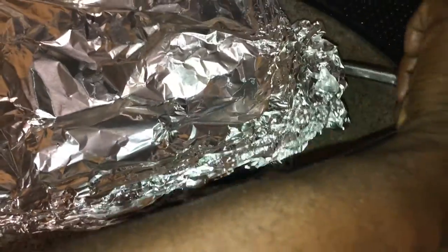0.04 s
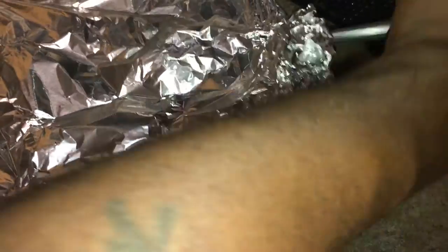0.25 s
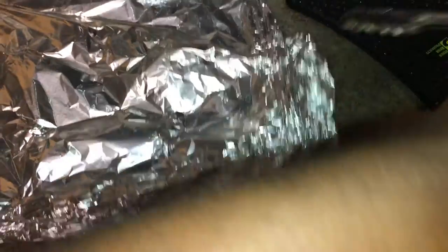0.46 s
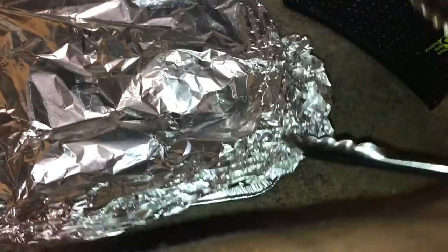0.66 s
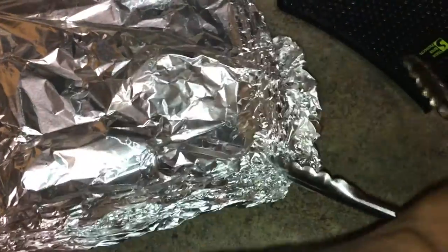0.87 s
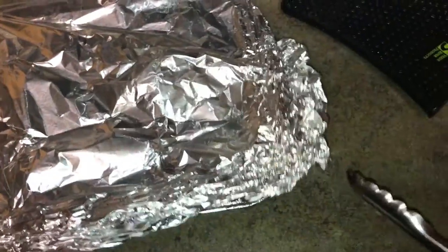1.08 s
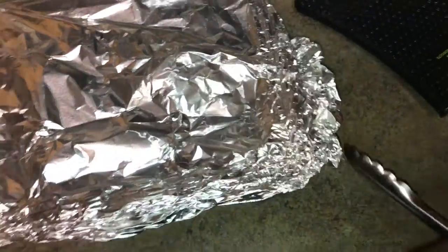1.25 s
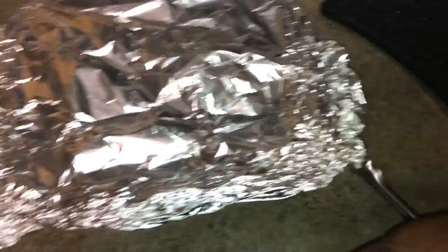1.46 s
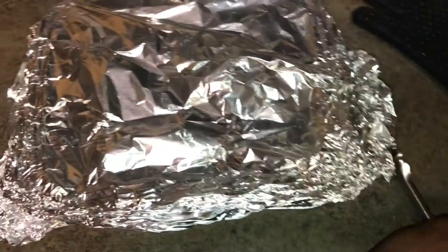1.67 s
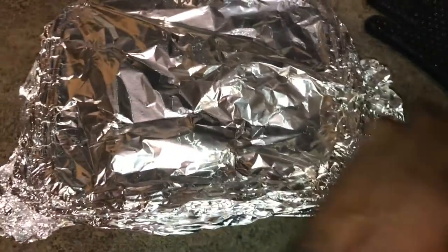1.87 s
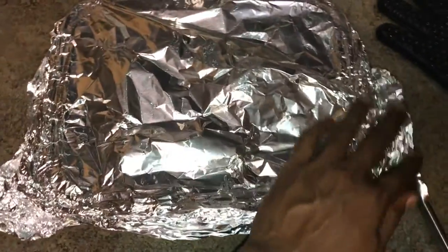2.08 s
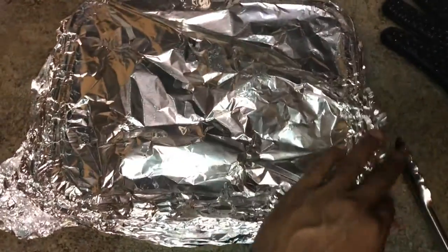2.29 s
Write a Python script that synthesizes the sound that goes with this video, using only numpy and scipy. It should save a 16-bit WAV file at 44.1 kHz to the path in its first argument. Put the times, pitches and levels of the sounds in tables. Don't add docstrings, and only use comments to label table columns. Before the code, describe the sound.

Aluminum foil crackles as it is crimped over a pan, then metal tongs clack on a counter

```python
import sys
import numpy as np
from scipy import signal
from scipy.fft import rfft, irfft
from scipy.io import wavfile

SR = 44100
rng = np.random.default_rng(int(sys.argv[2]) if len(sys.argv) > 2 else 0)


def gain_from_decibels(decibels):
    exponent = np.asarray(decibels, float) / 20
    return 10 ** exponent


def wav_record(signal):
    frames = np.transpose(np.atleast_2d(signal))
    bounded = np.clip(frames, -1, 1)
    quanta = np.round(bounded * 32767).astype(np.int16)
    wavfile.write(sys.argv[1], SR, quanta)


N = 102973

# [t/s, level/dB, brightness/dB]
PRESSURE = [
    [(0.0, -32, -22), (0.06, -49, -23), (0.15, -56.5, -5), (0.175, -57, -24), (0.205, -58, -26),
     (0.241, -46.5, -19), (0.28, -35, -1.5), (0.40, -43, 12), (0.478, -47, 11), (0.495, -48, -8),
     (0.6, -50.5, -12), (0.64, -66, -19), (0.7, -74, -15)],
    [(0.722, -48.5, 12.5), (0.80, -40.5, -19), (0.87, -49, -19), (0.93, -54.5, -35), (0.955, -59.5, 6),
     (1.0, -47.5, 1), (1.06, -46, 20.5), (1.09, -45, -23), (1.22, -69, 3.5)],
    [(2.084, -50.5, -3.5), (2.15, -49.5, -1.5), (2.25, -51.5, 1.5), (2.29, -43.5, -9), (2.335, -55, -3)],
]
# [t/s, peak level/dB, hold/s, dimple f/Hz, dimple level/dB]
HAND_SNAPS = [(0.0018, -29, .002, 1330, 8), (0.002, -34, .002, 4400, 11), (0.010, -29, .005, 380, 4),
              (0.011, -36, .002, 4300, 9), (0.018, -33, .004, 2400, -3), (0.027, -31, .003, 4400, -2),
              (0.213, -38, .002, 6300, -4), (0.229, -46, .003, 12000, -8), (0.242, -40, .002, 2500, -3),
              (0.249, -38, .002, 3540, -3), (0.255, -35, .003, 888, -2), (0.260, -36, .006, 255, 5),
              (0.278, -31, .003, 1140, -2), (0.293, -29, .004, 1770, -3), (0.304, -31, .003, 330, 0),
              (0.3225, -26, .007, 1275, 7), (0.345, -30, .003, 3000, -6), (0.388, -28, .004, 5740, -6),
              (0.398, -30, .003, 2050, -3), (0.425, -29, .003, 3400, -6), (0.451, -27, .004, 2000, -3),
              (0.472, -32, .003, 8500, -6), (0.5325, -24, .0015, 3300, -10), (0.554, -38, .004, 540, -2),
              (0.597, -42, .006, 2000, -10), (0.659, -40, .002, 3100, -2), (2.100, -42, .005, 958, 2),
              (2.1615, -30, .003, 3800, -3), (2.166, -54, .012, 360, 15), (2.1935, -30, .002, 1130, -6),
              (2.266, -39, .006, 1000, -5), (2.278, -35, .001, 1500, -10)]
# [t/s, peak level/dB, hold/s, dimple f/Hz, dimple level/dB]
TONG_SNAPS = [(0.7253, -26.5, 0.0049, 1140, -5.5), (0.7297, -24.5, 0.0041, 6670, -1),
              (0.744, -25, 0.0034, 1090, -7), (0.748, -31.5, 0.0029, 2340, -0.5),
              (0.756, -33, 0.0049, 1190, 1), (0.781, -40, 0.002, 1040, 6),
              (0.802, -31.5, 0.0083, 1150, 2.5), (0.810, -25, .002, 1050, -3), (0.816, -48, .03, 347, 17),
              (0.827, -32, .003, 5800, -8), (0.852, -27, .002, 3600, -10), (0.884, -38, 0.012, 3500, 3),
              (0.902, -39, 0.0032, 2960, 7.5), (0.914, -30, 0.002, 3280, 1), (0.918, -41.5, 0.006, 1910, 3),
              (0.967, -18, 0.01, 820, -12), (0.98, -22, 0.0022, 357, -3.5), (1.006, -29, 0.011, 800, -4),
              (1.017, -24, 0.0042, 873, -9.5), (1.021, -27.5, 0.0073, 784, -2),
              (1.031, -17, 0.0046, 2760, -13), (1.035, -18, 0.00029, 800, -16.5),
              (1.037, -17, 0.0021, 3650, -20), (1.045, -26.5, 0.0067, 2440, -15),
              (1.051, -26, 0.0063, 3650, -20), (1.101, -41.5, 0.0037, 744, -17),
              (1.165, -39, 0.0072, 1580, -35)]
# [f/Hz, density level/dB]
RUSTLE_SPECTRUM = [(88, -53), (303, 2.5), (1140, 0), (1900, -4.5), (2270, -3.5), (7400, -7.5), (8700, -4),
                   (10300, -13.5), (16000, -11)]
# [f/Hz, density level/dB]
SNAP_SPECTRUM = [(120, -19), (200, -27.5), (735, 0), (3560, 2), (4680, -1.5), (6400, 3.5), (7140, -2.5),
                 (9580, -3), (16000, -5.5)]
# [t/s, peak level/dB, hold/s, thud level/dB, boom level/dB]
KNOCKS = [
    (1.4286, -6, 0.0011, -6.5, -11),
    (1.45, -50, 0.00071, 13, -10),
    (1.568, -20.5, 0.001, 1.5, -5.5),
    (1.617, -60.5, 0.076, 10, -8),
    (1.685, -43.5, 0.019, 6, -9),
    (1.71, -3.5, 0.0009, -17.5, -36),
    (1.7121, -11.5, 0.00664, -18.5, -5.5),
    (1.752, -16.5, 0.0028, -16.5, -10),
    (1.763, -46, 0.01, -11, 4),
]
HELD_KNOCKS = 4
# [f/Hz, level/dB, t60/s]
ARMS_HELD = [(2550, -10, .05), (4110, -7, .08), (5190, -24, .25), (5800, -18, .28), (5950, -5, .03),
             (7860, -20, .1), (8740, -20, .22)]
# [f/Hz, level/dB, t60/s]
ARMS_LOOSE = [(3350, -4, .03), (3580, 0, .035), (3790, -5, .05), (4772, -11, .2), (5240, -20, .42),
              (5880, -17, .15), (6270, -15, .33), (7176, -24, .3), (7400, -16, .1), (8823, -18, .11),
              (9600, -20, .15), (10730, -16, .1), (12860, -20, .15), (14300, -16, .1)]
# [f/Hz, density level/dB]
CLACK_SPECTRUM = [(500, -6), (1200, -14.5), (1910, -9.5), (3300, 3), (5000, -1.5), (6650, -2), (14200, -9),
                  (16000, -9.5)]
# [f/Hz, density level/dB]
THUD_SPECTRUM = [(88, -32), (150, -5.5), (218, -4), (588, -1.5), (1450, -8), (1730, -12.5), (3000, -15),
                 (3900, -50), (6600, -120)]
# [f/Hz, width/Hz, level/dB]
COUNTER_BODY = [(163, 22.5, -7), (260, 49, 1.5), (322, 32, -7), (460, 20, -7.5), (567, 14, -4),
                (800, 32, -16), (935, 27, -21)]
# [f/Hz, level/dB, t60/s]
CUPBOARD = [(91, -12, 0.13), (135, -12, 0.11), (275, -9, 0.07)]
# [f/Hz, level/dB, t60/s]
STRUCK_FLAT = [(177.2, -22.5, 0.58), (330, -8.5, 0.046), (464.6, -18, 0.33), (570, -13, 0.046),
               (800, -14.5, 0.073), (960, -14, 0.039), (1250, -12.5, 0.041), (1383, -19, .05)]
# [f/Hz, level/dB, t60/s]
STRUCK_EDGE = [(277.5, 8.5, 0.073), (492, -1.5, 0.086), (570, -5, 0.14), (936, -35, 0.069),
               (1478, -6, 0.054)]
# [f/Hz, density level/dB]
AIR_SPECTRUM = [(15, -4), (25, 2.5), (74, -3.5), (206, -18), (2760, -32), (6920, -33), (7710, -37.5),
                (11600, -38.5), (16000, -41.5)]

GRAIN_CYCLES, DIMPLE_CYCLES = 25, 24
SNAP_DB, SNAP_T60_S, TICK_DB, TICK_T60_S = -11, 0.022, -6, 0.00034
SHIVER_DB, SHIVER_T60_S, SHIVER_CUT_HZ = -7, 0.075, 3600
DIMPLE_DB, BRIGHT_HZ = -3, 4000
CLACK_DB, CLACK_T60_S, CLACK_TAIL_DB, CLACK_TAIL_T60_S = -13.5, 0.031, -20, 0.31
THUD_DB, THUD_T60_S, THUD_TAIL_DB, THUD_TAIL_T60_S = -8.5, 0.024, -8, 0.32
RING_DB, RING_BLUR_HZ, RING_WAVER_DB = -22, 32, 2.5
BODY_DB, STRUCK_DB, CRACK_DB = -2, -7.5, -25
KITCHEN_DB, KITCHEN_T60_S, WALL_CUT_HZ, AIR_DB = -12, 0.42, 2540, -56
RUMBLE_CUT_HZ, TOP_CUT_HZ, OVERLOAD = 73, 16080, 0.6


def foil():
    return rustle() + snaps() + dimples()


def rustle():
    t = np.arange(N) / SR
    push, tight_db = np.zeros((2, N))
    for rows in PRESSURE:
        s, db, bright_db = np.transpose(rows)
        tight_db += np.interp(t, s, bright_db, left=0, right=0)
        push += gain_from_decibels(np.interp(t, s, db, left=-120, right=-120))
    push *= gain_from_decibels(drift(64))
    rub = colour(push * crackle(7000, 1.5), RUSTLE_SPECTRUM)
    low = lowpass(rub, BRIGHT_HZ)
    return low + (rub - low) * gain_from_decibels(tight_db)


def snaps():
    snap, shiver = np.zeros((2, N))
    for s, db, hold, _, _ in HAND_SNAPS + TONG_SNAPS:
        tick = gain_from_decibels(TICK_DB) * burst(s, 0, TICK_T60_S)
        snap += gain_from_decibels(db + SNAP_DB) * (burst(s, hold, SNAP_T60_S) + tick)
        shiver += gain_from_decibels(db + SNAP_DB + SHIVER_DB) * burst(s, hold, SHIVER_T60_S)
    dull = lowpass(shiver * crackle(9000, 4.0), SHIVER_CUT_HZ)
    return colour(snap * crackle(8000, 5.6) + dull, SNAP_SPECTRUM)


def dimples():
    rub, out = rng.standard_normal(N), np.zeros(N)
    for s, db, hold, hz, dimple_db in HAND_SNAPS + TONG_SNAPS:
        out += gain_from_decibels(db + dimple_db + DIMPLE_DB) * dimple(s, hold, hz, rub)
    return out


def dimple(s, hold, hz, rub):
    if hz < 400:
        t = np.arange(N) / SR - s
        return 0.63 * burst(s, hold, DIMPLE_CYCLES / hz) * np.sin(2 * np.pi * hz * t)
    near = slice(int(s * SR), int((s + 0.25) * SR))
    kick = (burst(s, 0.17 * hold, 0.0027 + 4.5 * hold) * rub)[near]
    low = ring(kick, hz, DIMPLE_CYCLES / hz)
    tone = np.zeros(N)
    tone[near] = low / np.abs(low).max()
    if 1200 < hz < 2500:
        high = ring(kick, min(hz * 1.85, 15000), DIMPLE_CYCLES / hz / 1.6)
        tone[near] += 1.56 * high / np.abs(high).max()
    return tone


def crackle(rate, spread_db):
    sizes = gain_from_decibels(spread_db * np.minimum(rng.exponential(1, N), 4)) * rng.choice([-1, 1], N)
    clicks = sizes * (rng.random(N) < rate / SR)
    patch = rng.integers(0, 30, N)
    rings = np.zeros(N)
    for k, hz in enumerate(np.geomspace(250, 15000, 30)):
        rings += ring(clicks * (patch == k), hz, GRAIN_CYCLES / hz) * hz / 3000
    return rms_one(rms_one(rings) + 1.98 * rms_one(clicks))


def tongs():
    return arms() + clack_and_thud() + cupboard()


def arms():
    out = np.zeros(N)
    buzz = np.array([drift(60), drift(90)])
    for rows, modes in ((KNOCKS[:HELD_KNOCKS], ARMS_HELD), (KNOCKS[HELD_KNOCKS:], ARMS_LOOSE)):
        for hz, mode_db, t60 in modes:
            shake = sum(gain_from_decibels(db + RING_DB + mode_db) * burst(s, hold, t60) for s, db, hold, *_ in rows)
            waver = np.roll(buzz, int(hz), axis=1)
            phase = 2 * np.pi * np.cumsum(hz + RING_BLUR_HZ * waver[1]) / SR
            out += shake * gain_from_decibels(RING_WAVER_DB * waver[0]) * np.sin(phase)
    return out


def clack_and_thud():
    clack, thud = np.zeros((2, N))
    for s, db, hold, thud_db, _ in KNOCKS:
        clack_tail = gain_from_decibels(CLACK_TAIL_DB) * burst(s, hold, CLACK_TAIL_T60_S)
        clack += gain_from_decibels(db + CLACK_DB) * (burst(s, hold, CLACK_T60_S) + clack_tail)
        thud_tail = gain_from_decibels(THUD_TAIL_DB) * burst(s, hold, THUD_TAIL_T60_S)
        thud += gain_from_decibels(db + thud_db + THUD_DB) * (burst(s, hold, THUD_T60_S) + thud_tail)
    rattle = rng.standard_normal((2, N)) * gain_from_decibels(2.77 * drift(380))
    clack, thud = clack * rattle[0], thud * rattle[1]
    out = colour(clack, CLACK_SPECTRUM) + colour(thud, THUD_SPECTRUM)
    for k, (hz, width, db) in enumerate(COUNTER_BODY):
        out += gain_from_decibels(db + BODY_DB) * resonance(thud, hz, width) * (-1) ** k
    return out


def cupboard():
    push = np.zeros(N)
    for s, db, hold, _, boom_db in KNOCKS:
        push[int((s + hold) * SR)] = gain_from_decibels(db + boom_db)
    return sum(gain_from_decibels(db) * ring(push, hz, t60) for hz, db, t60 in CUPBOARD)


def counter():
    out, crack = np.zeros((2, N))
    for rows, modes in ((KNOCKS[:HELD_KNOCKS], STRUCK_FLAT), (KNOCKS[HELD_KNOCKS:], STRUCK_EDGE)):
        hit = np.zeros(N)
        for s, db, _, thud_db, _ in rows:
            contact = int(s * SR) + 12
            hit[contact] = gain_from_decibels(db + min(thud_db + 4, 6) + STRUCK_DB)
            crack[contact] = gain_from_decibels(db + CRACK_DB)
        for k, (hz, db, t60) in enumerate(modes):
            out += gain_from_decibels(db) * ring(hit, hz, t60) * (-1) ** k
    return out + colour(crack, CLACK_SPECTRUM)


def kitchen(x):
    t = np.arange(SR // 2) / SR
    decay = gain_from_decibels(-60 * t / KITCHEN_T60_S)
    noise = rng.standard_normal(len(t)) * np.clip(t / 0.0013, 0, 1) * decay
    low = lowpass(noise, WALL_CUT_HZ)
    tail = low + (noise - low) * decay
    return signal.fftconvolve(x, tail / np.sqrt(np.sum(tail ** 2)))[:N]


def air():
    return gain_from_decibels(AIR_DB + drift(6)) * colour(rng.standard_normal(N), AIR_SPECTRUM)


def burst(s, hold, t60):
    out, start = np.zeros(N), int(s * SR)
    end = min(N, start + int((hold + 2 * t60) * SR) + 2)
    t = np.arange(start, end) / SR - s
    out[start:end] = np.clip(t * 2500, 0, 1) * gain_from_decibels(-60 * np.clip(t - hold, 0, None) / t60)
    return out


def ring(clicks, hz, t60):
    r, w = gain_from_decibels(-60 / (t60 * SR)), 2 * np.pi * hz / SR
    return signal.lfilter([0, np.sin(w)], [1, -2 * r * np.cos(w), r * r], clicks + 1e-18)


def resonance(x, hz, width_hz):
    r, w = np.exp(-np.pi * width_hz / SR), 2 * np.pi * hz / SR
    return signal.lfilter([(1 - r * r) / 2, 0, (r * r - 1) / 2], [1, -2 * r * np.cos(w), r * r], x)


def colour(x, spectrum):
    hz, db = np.transpose(spectrum)
    grid = np.maximum(np.arange(4097) * SR / 8192, 10)
    log_gain = np.interp(np.log(grid), np.log(hz), db) * np.log(10) / 20
    cepstrum = irfft(log_gain)
    cepstrum[1:4096] *= 2
    cepstrum[4097:] = 0
    taps = irfft(np.exp(rfft(cepstrum)))
    return signal.fftconvolve(x, taps / np.sqrt(np.sum(taps ** 2)))[:N]


def lowpass(x, hz):
    return signal.sosfilt(signal.butter(1, hz, fs=SR, output="sos"), x)


def drift(rate):
    r = np.exp(-2 * np.pi * rate / SR)
    return rms_one(signal.lfilter([1], [1, -2 * r, r * r], rng.standard_normal(N + SR))[SR:])


def rms_one(x):
    return x / np.sqrt(np.mean(x ** 2) + 1e-20)


def scene():
    near = foil() + tongs() + counter()
    return (near + gain_from_decibels(KITCHEN_DB) * kitchen(near) + air())[None]


def band_limit(x):
    return signal.sosfilt(signal.butter(12, 16830, fs=SR, output="sos"), x)


def record(dry):
    clear = signal.sosfilt(signal.butter(2, RUMBLE_CUT_HZ, "high", fs=SR, output="sos"), dry)
    rounded = OVERLOAD * np.tanh(clear / OVERLOAD)
    mix = signal.sosfilt(signal.cheby2(12, 40, TOP_CUT_HZ, fs=SR, output="sos"), rounded)
    return band_limit(mix)


dry = scene()
out = record(dry)
wav_record(out)
```